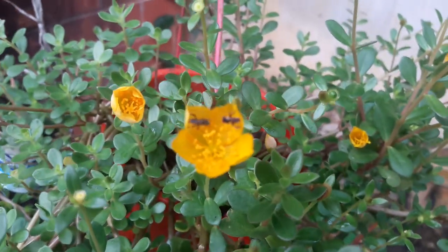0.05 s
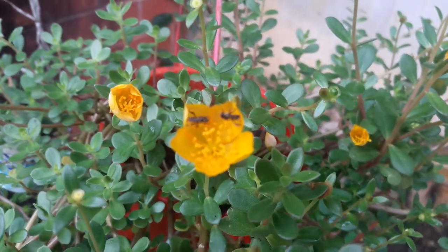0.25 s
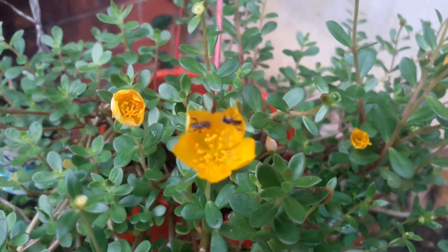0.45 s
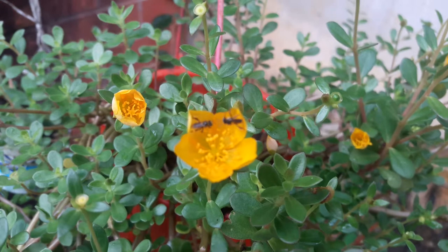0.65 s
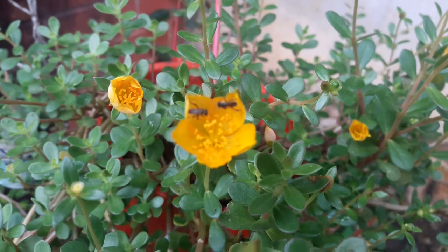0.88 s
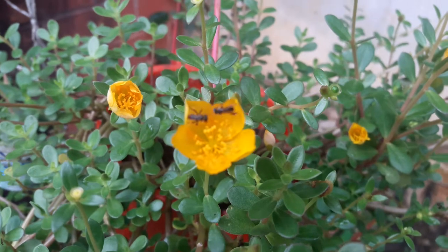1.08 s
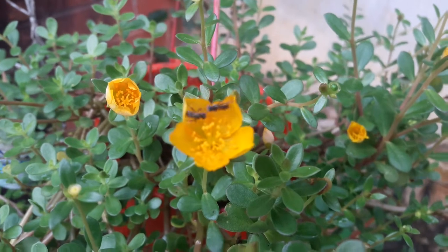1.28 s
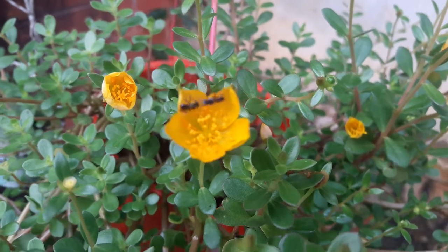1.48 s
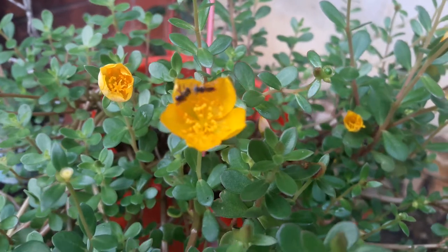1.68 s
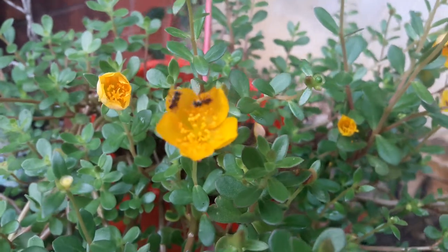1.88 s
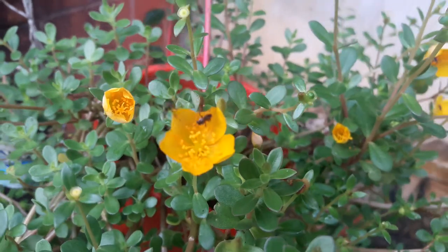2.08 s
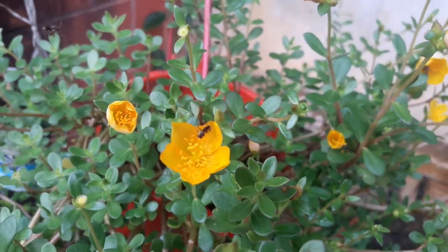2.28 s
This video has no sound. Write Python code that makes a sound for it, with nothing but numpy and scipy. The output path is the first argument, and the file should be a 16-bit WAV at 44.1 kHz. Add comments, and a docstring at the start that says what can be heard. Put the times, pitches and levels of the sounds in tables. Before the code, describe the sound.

A distant crow caws once, harshly, with a short echo. Before it, a hand-held microphone takes a close knock and soft low thumps, while a quiet garden carries far-off rumble, faint insects and thin bird whistles.

```python
"""A garden, with a bed of far-off rumble and hum, and insects buzzing in three pitch bands.
Small birds whistle faintly. Close by, the hand-held microphone takes a few knocks that ring its
housing, low throbs and light finger brushes. Then a distant crow gives one harsh, arching caw:
uneven pulses and breath ring its throat, and the call echoes between walls."""
import sys
import numpy as np
from scipy import signal
from scipy.fft import rfft, irfft, next_fast_len
from scipy.io import wavfile
from scipy.ndimage import uniform_filter1d

SR = 44100
rng = np.random.default_rng(int(sys.argv[2]) if len(sys.argv) > 2 else 0)


def pcm_store(signal):
    """Save signal as 16-bit PCM."""
    levels = np.round(np.clip(np.atleast_2d(signal), -1, 1) * 32767)
    wavfile.write(sys.argv[1], SR, levels.astype(np.int16).T)


N = 108045
T = np.arange(N) / SR


def from_db(db):
    """Decibels to gain."""
    return 10 ** (np.asarray(db) / 20)


def unit_rms(x):
    """Scale to unit power."""
    return x / np.sqrt(np.mean(x ** 2) + 1e-20)


def automation(rows):
    """Straight ramps between (time, value) breakpoints."""
    return np.interp(T, *np.transpose(rows))


def drift(rate_hz):
    """Smooth random modulation up to about the given rate; rms 1."""
    lowpass = signal.butter(2, rate_hz, fs=SR, output="sos")
    return unit_rms(signal.sosfilt(lowpass, rng.standard_normal(N + SR))[SR:])


def band(x, low, high):
    """Band-pass with unit gain in the middle."""
    edges = [max(low, 10), min(high, SR / 2 - 100)]
    return signal.sosfilt(signal.butter(2, edges, "band", fs=SR, output="sos"), x)


def phase_of(hz):
    """Phase in radians of a steady or moving pitch."""
    return 2 * np.pi * np.cumsum(hz + np.zeros(N)) / SR


def narrow_noise(hz, width_hz):
    """Many unrelated voices crowded about one pitch; rms 1."""
    lowpass = signal.butter(3, width_hz / 2, fs=SR, output="sos")
    crowd = signal.sosfilt(lowpass, rng.standard_normal((2, N + SR)))[:, SR:]
    return unit_rms(crowd[0] * np.cos(phase_of(hz)) + crowd[1] * np.sin(phase_of(hz)))


# Tone of the rumble bed: (frequency [Hz], relative spectral density [dB])
RUMBLE_SPECTRUM = [(25, -20.5), (65, 0.5), (130, -2), (240, 2), (320, -5), (420, -1.5), (600, -7.5),
                   (1100, -8), (1750, -9.5), (2300, -10), (3200, -20.5), (4500, -24.5), (6300, -32),
                   (7800, -49), (11500, -34.5), (16000, -40.5)]
# Fader ride on the bed: (time [s], level [dB])
RUMBLE_FADER = [(0, -52.5), (.3, -57), (.7, -57.5), (1.55, -58.5), (2.1, -54), (2.45, -57)]


def far_rumble(waver_db):
    """Outdoor noise bed in third-octave bands, each wavering on its own."""
    edges = 22 * 2 ** (np.arange(30) / 3)
    white = rng.standard_normal((2, N))
    hz, db = np.transpose(RUMBLE_SPECTRUM)
    bed = 0
    for k, (low, high) in enumerate(zip(edges, edges[1:])):
        level_db = np.interp(np.log(low * high) / 2, np.log(hz), db)
        noise = band(band(white[k % 2], low, high), low / 1.1, high * 1.1)
        bed += from_db(level_db + waver_db * drift(8)) * noise
    return unit_rms(bed) * from_db(automation(RUMBLE_FADER))


# Distant swells: (peak time [s], length [s], pitch [Hz], width [Hz], level [dB])
DRONES = [(.183, 0.031, 185, 33, -51), (.28, 0.25, 197, 16, -56.5), (0.59, 0.89, 248, 14.2, -60.5),
          (1.41, 0.67, 171, 10.8, -63.5), (1.54, 1.6, 240, 23, -66.5), (1.266, 0.4, 1680, 400, -64),
          (0.011, 0.25, 3300, 1350, -65)]


def drones():
    """Far-off low hums and higher hazes: noise bands that fade in and out."""
    return sum(from_db(db) * np.exp(-(2 * (T - peak) / length) ** 2) * narrow_noise(hz, width)
               for peak, length, hz, width, db in DRONES)


# Steady insect choirs: (pitch [Hz], width [Hz], level [dB], flutter [dB])
CHOIRS = [(2485, 147, -68, 2.5), (5130, 510, -76.5, 1), (9880, 710, -72.5, 1.24)]
# Nearest insects: (start [s], end [s], pitch [Hz], width [Hz], stroke rate [Hz], level [dB])
BUZZES = [(-.06, 0.026, 5240, 205, 160, -59), (0.222, 0.286, 5240, 160, 98, -59),
          (0.79, 1.254, 5417, 334, 82, -62.5), (1.435, 1.646, 5425, 200, 140, -61.5),
          (1.78, 2.078, 5380, 285, 100, -59.5), (2.0, 2.354, 5280, 300, 91, -61.5)]


def insects(swell_s=0.092, stop_s=0.037, stroke_depth=0.14):
    """Buzzing phrases swell, pulse with their strokes and stop, over steady choirs."""
    out = sum(from_db(db + flutter_db * drift(21)) * narrow_noise(hz, width)
              for hz, width, db, flutter_db in CHOIRS)
    for start, end, hz, width, rate, db in BUZZES:
        envelope = (1 + np.tanh((T - start) / swell_s)) * (1 - np.tanh((T - end) / stop_s)) / 4
        strokes = 1 + stroke_depth * np.cos(phase_of(rate))
        core = narrow_noise(hz, width)
        skirt = from_db(-12) * narrow_noise(hz - 260, width_hz=500)
        out += from_db(db) * envelope * strokes * (core + skirt)
    return out


def garden_reverb(x, t60_s=1):
    """Sound scattered between walls: twelve dying echo loops, wet only."""
    size = next_fast_len(N + 2 * SR)
    omega = 2 * np.pi * np.arange(size // 2 + 1) / size
    loops = 0
    for k, lag_s in enumerate(rng.uniform(.03, .11, 12)):
        round_trip = from_db(-60 * lag_s / t60_s) * np.exp(-1j * omega * int(lag_s * SR))
        loops += (-1) ** k * round_trip / (1 - round_trip)
    return irfft(rfft(x, size) * loops / np.sqrt(np.mean(abs(loops) ** 2)), size)[:N]


# Far birds: (start [s], length [s], first pitch [Hz], last pitch [Hz], arch [Hz], level [dB])
WHISTLES = [(-.03, .25, 6250, 6450, 460, -76), (-.04, .13, 2950, 2600, -100, -56),
            (1.88, .09, 4250, 3750, 0, -67), (1.945, .115, 3650, 2610, -340, -56),
            (1.9, .2, 10400, 10600, 200, -78), (2.1, .13, 11000, 11300, 350, -77),
            (2.26, .26, 1090, 1075, 0, -57)]


def small_birds(wet_db=-5):
    """Thin whistles that glide along an arch, blurred by the garden's reverb."""
    waver = 1 + .009 * drift(100)
    song = np.zeros(N)
    for start, length, first_hz, last_hz, arch_hz, db in WHISTLES:
        progress = np.clip((T - start) / length, 0, 1)
        swell = np.sin(np.pi * progress)
        pitch = first_hz + (last_hz - first_hz) * progress + arch_hz * swell
        song += from_db(db) * swell * np.sin(phase_of(pitch * waver))
    return song + from_db(wet_db) * garden_reverb(song)


# Hits on the microphone: (time [s], level before filtering [dB], contact [s])
KNOCKS = [(0.0932, -40, 0.0026), (.2286, -13, 0.00179), (.8275, -40, 0.00534)]
# Resonances of its housing: (pitch [Hz], time to fall 60 dB [s], resonator drive [dB])
HOUSING_MODES = [(134, 0.047, -32.5), (313, 0.033, -27)]


def knocks(skew=0.84, dull_hz=2710):
    """Each knock pushes the housing in and back and leaves it ringing briefly."""
    push = sum(from_db(db) * np.sin(2 * np.pi * np.clip((T - start) / contact, 0, 1) ** skew)
               for start, db, contact in KNOCKS)
    push = band(push, 55, dull_hz)
    ring = 0
    for hz, t60, db in HOUSING_MODES:
        decay, omega = from_db(-60 / (t60 * SR)), 2 * np.pi * hz / SR
        feedback = [1, -2 * decay * np.cos(omega), decay * decay]
        ring += from_db(db) * signal.lfilter([0, np.sin(omega) / 10], feedback, push + 1e-18)
    return push + ring


# Low end of the handling noise: (peak time [s], level [dB], attack [s], release [s])
THROBS = [(0.159, -42, 0.042, .03), (.47, -43.5, 0.032, 0.077), (2.39, -58, 0.019, 0.027)]


def throbs(pitch_hz=65.3):
    """Handling the microphone makes a bass tone swell and die."""
    out = 0
    for peak, db, attack, release in THROBS:
        envelope = np.exp(-((T - peak) / np.where(T < peak, attack, release)) ** 2)
        out += from_db(db) * envelope * np.sin(2 * np.pi * pitch_hz * (T - peak))
    return out


# Light touches of the fingers: (time [s], level [dB])
BRUSHES = [(.133, -62), (.228, -64), (.705, -75), (1.445, -71), (2.185, -70)]


def finger_brushes(half_length_s=0.0052):
    """Fingers scuff the microphone: tiny, soft bursts of bright noise."""
    envelope = sum(from_db(db) * np.exp(-((T - peak) / half_length_s) ** 2) for peak, db in BRUSHES)
    return envelope * unit_rms(band(rng.standard_normal(N), 2200, 5430))


# The caw's pitch arch: (time [s], pitch [Hz])
CAW_PITCH = [(1.66, 415), (1.685, 443.4), (1.715, 465.8), (1.755, 475.2), (1.79, 467.7), (1.815, 447.2),
             (1.84, 424.2), (1.88, 405)]
# The crow's effort: (time [s], level before the wall mix [dB])
CAW_EFFORT = [(1.645, -82), (1.672, -51.5), (1.685, -39.5), (1.698, -48), (1.708, -38), (1.725, -42),
              (1.8, -42.5), (1.813, -37.5), (1.845, -45.5), (1.87, -46), (1.9, -68)]
# Formants of its throat: (centre [Hz], width [Hz], relative gain [dB])
THROAT_FORMANTS = [(978, 175, -5), (1346, 220, 0.5), (1772, 220, 3), (2124, 345, -6.5), (3120, 620, -17),
                   (6080, 600, -28.5)]


def crow(jitter=0.01952, rasp=0.52, breath=0.45):
    """Uneven pulses from the syrinx and puffs of air ring the throat in one dry caw."""
    phase = phase_of(automation(CAW_PITCH) * (1 + jitter * drift(197)))
    phase += .2 * np.sin(phase / 3)  # the syrinx repeats itself only every third cycle
    pulses = unit_rms(sum(np.cos(k * phase) for k in range(1, 17)))
    pulses *= 1 + rasp * drift(210)
    puffs = breath * (1 + np.cos(phase)) * rng.standard_normal(N)
    voice = sum((-1) ** k * from_db(db) * band(pulses + puffs, hz - width / 2, hz + width / 2)
                for k, (hz, width, db) in enumerate(THROAT_FORMANTS))
    voice /= np.sqrt(uniform_filter1d(voice ** 2, size=600) + 1e-12)  # flatten, so effort sets level
    gate = (T > CAW_EFFORT[0][0]) * (T < CAW_EFFORT[-1][0])
    return voice * from_db(automation(CAW_EFFORT)) * gate


# Slapback off the walls: (delay [s])
SLAP_DELAYS = [.019, 0.043]


def between_walls(caw, direct_db=-1.5, slap_db=-9.5, reverb_db=-10.5, late_db=-6.5, late_s=.21):
    """The direct caw, its slaps off the walls, and a reverb also fed by a late, narrow-band echo."""
    slaps = sum(np.interp(T - delay, T, caw) for delay in SLAP_DELAYS)
    late_echo = band(np.interp(T - late_s, T, caw), 1940, 2250)
    tail = garden_reverb(from_db(reverb_db) * caw + from_db(late_db) * late_echo)
    return from_db(direct_db) * caw + from_db(slap_db) * slaps + tail


def scene():
    """A nearly mono mix: only a trace of rumble, reverb and hiss gives it width."""
    caw = between_walls(crow())
    ambience = far_rumble(waver_db=1.5) + drones() + insects() + small_birds()
    mid = ambience + knocks() + throbs() + finger_brushes() + caw
    hiss = from_db(-91.5) * unit_rms(band(rng.standard_normal(N), 11000, 17000))
    side = from_db(-18) * far_rumble(waver_db=-0.5) + from_db(-45) * garden_reverb(caw) + hiss
    return mid + side * np.array([[1], [-1]])


def record(dry, cutoff_hz=15750):
    """A steep high cut on the whole mix."""
    return signal.sosfilt(signal.ellip(12, .1, 80, cutoff_hz, fs=SR, output="sos"), dry)


dry = scene()
out = record(dry)
pcm_store(out)
```